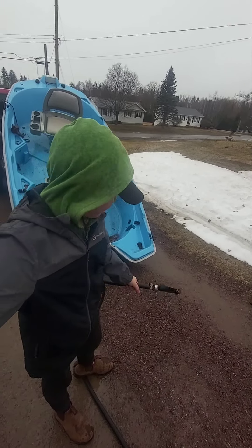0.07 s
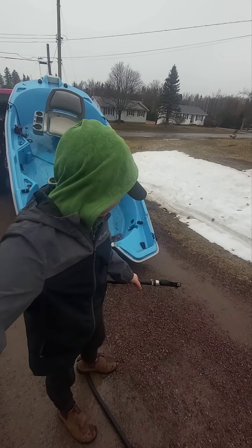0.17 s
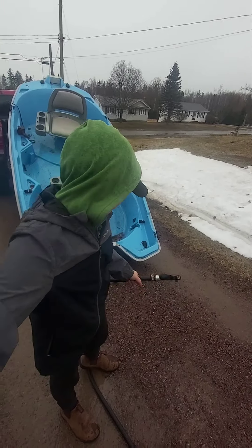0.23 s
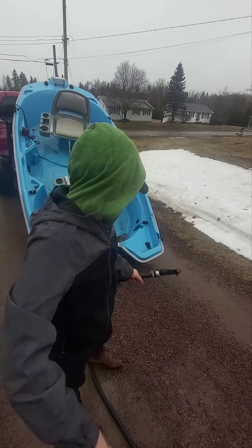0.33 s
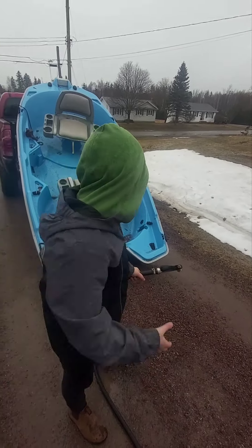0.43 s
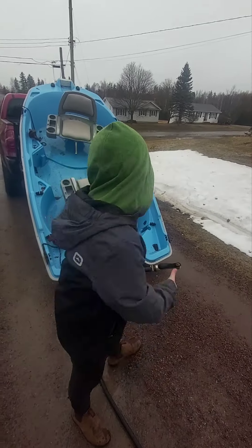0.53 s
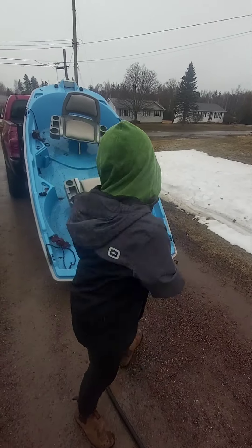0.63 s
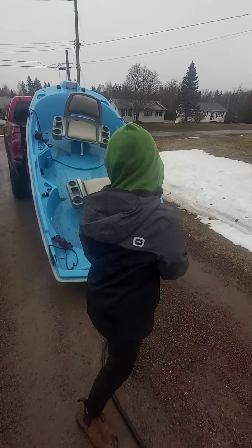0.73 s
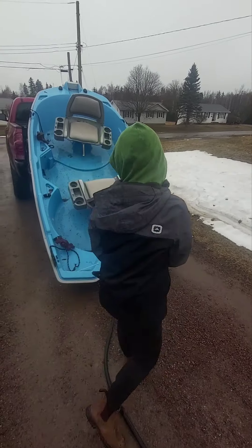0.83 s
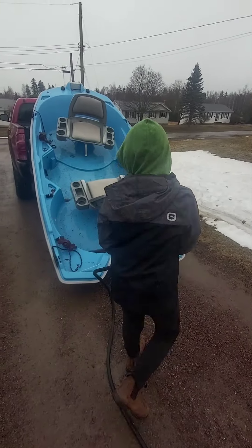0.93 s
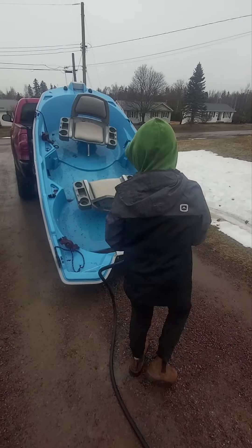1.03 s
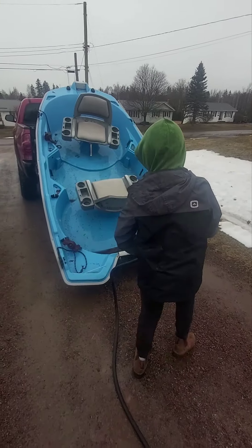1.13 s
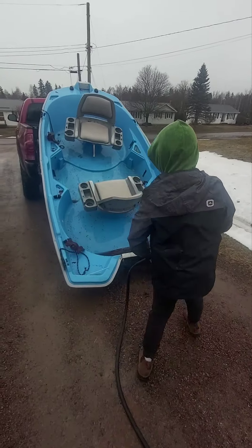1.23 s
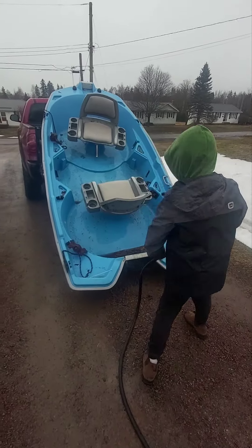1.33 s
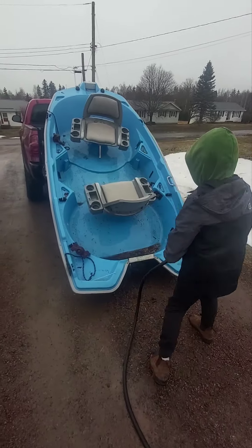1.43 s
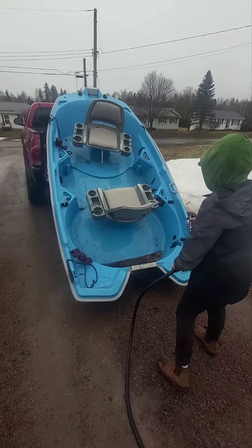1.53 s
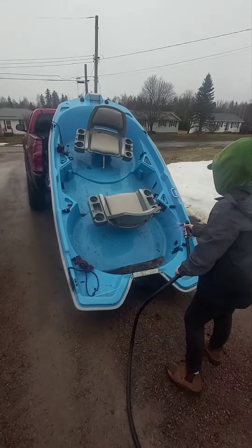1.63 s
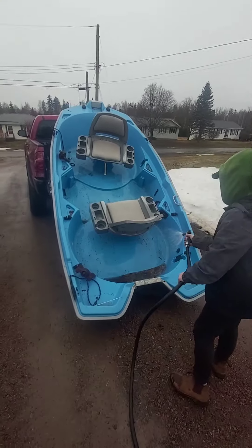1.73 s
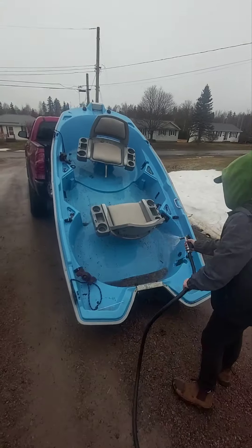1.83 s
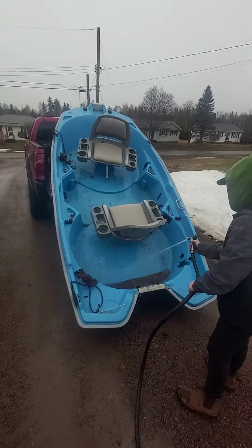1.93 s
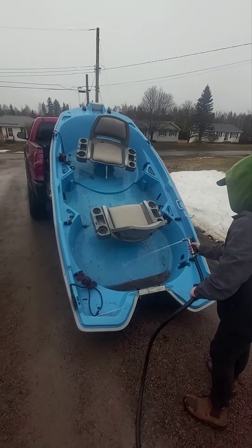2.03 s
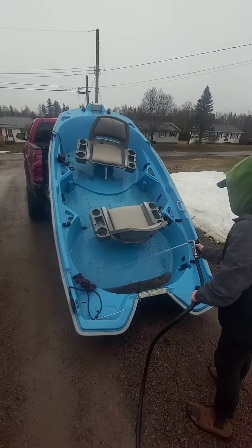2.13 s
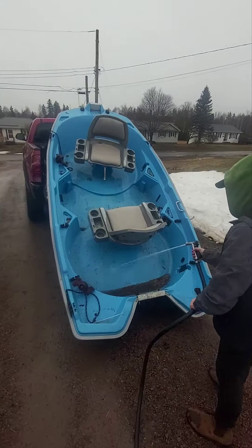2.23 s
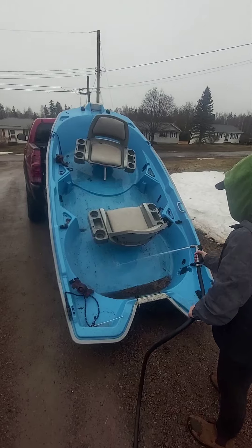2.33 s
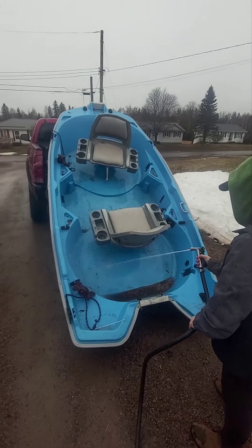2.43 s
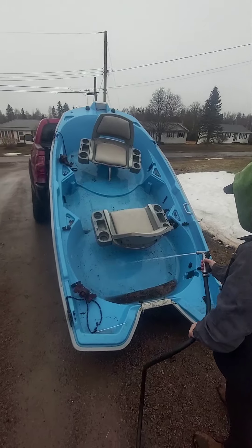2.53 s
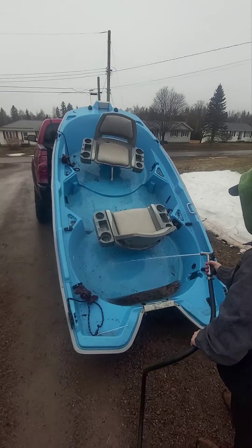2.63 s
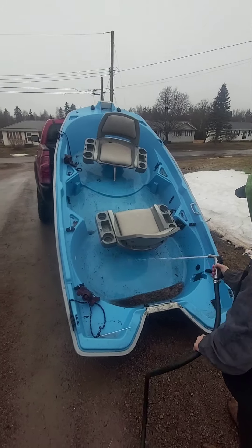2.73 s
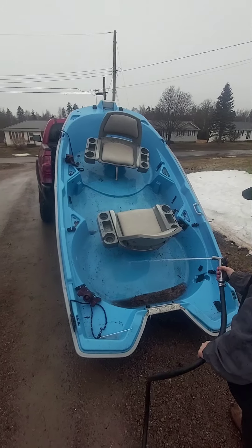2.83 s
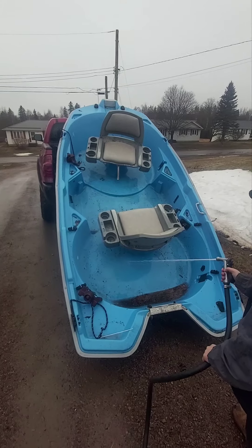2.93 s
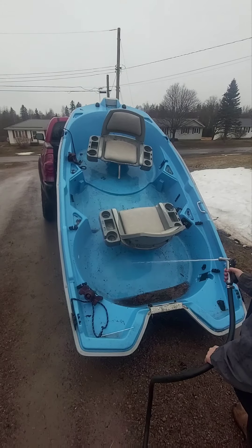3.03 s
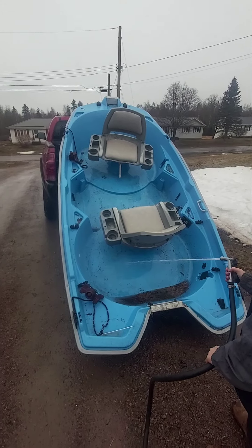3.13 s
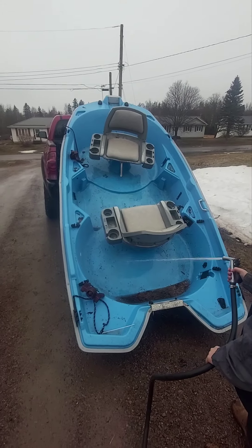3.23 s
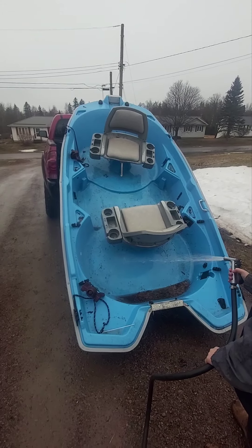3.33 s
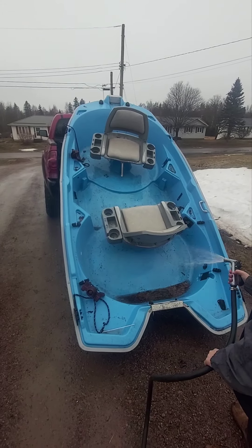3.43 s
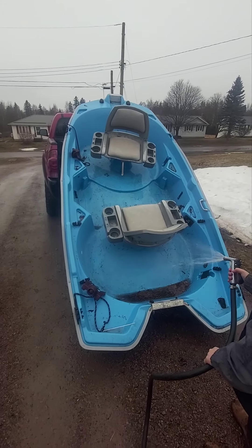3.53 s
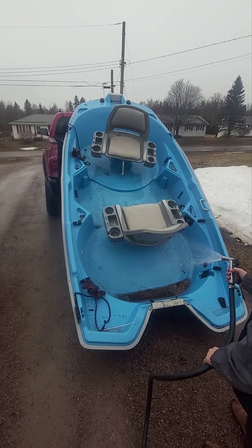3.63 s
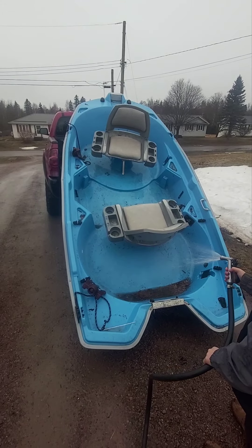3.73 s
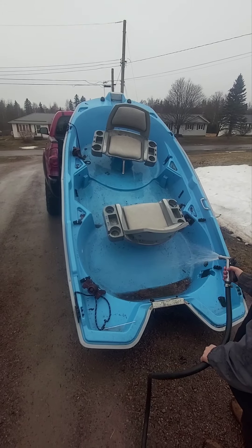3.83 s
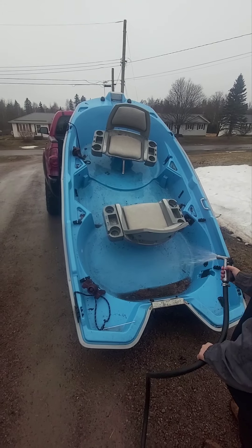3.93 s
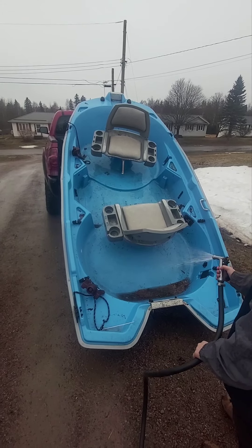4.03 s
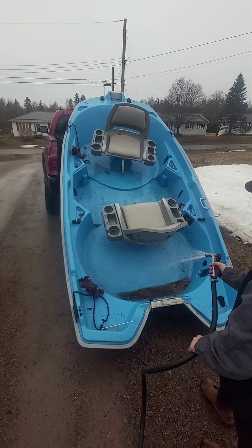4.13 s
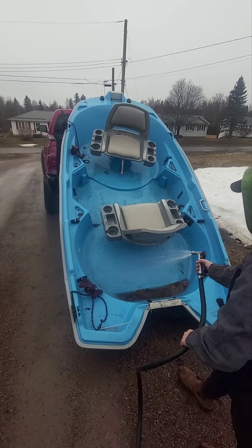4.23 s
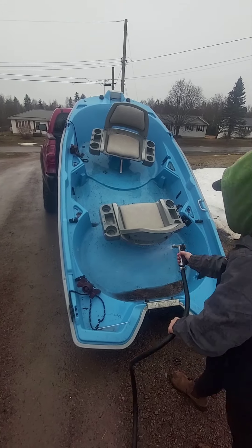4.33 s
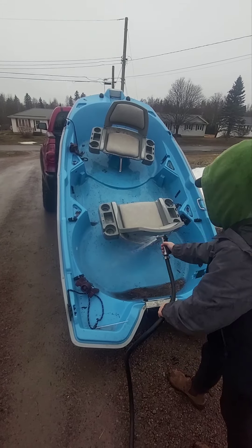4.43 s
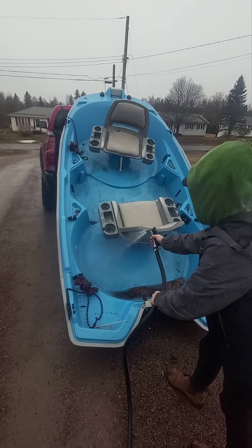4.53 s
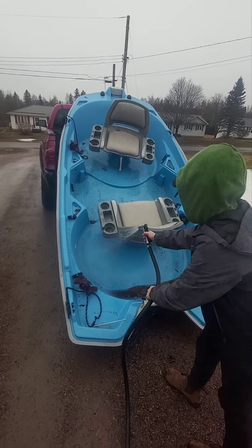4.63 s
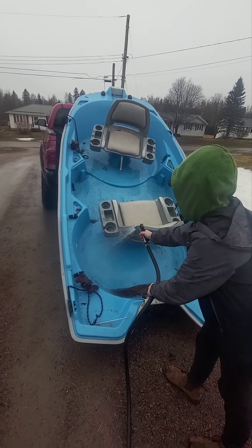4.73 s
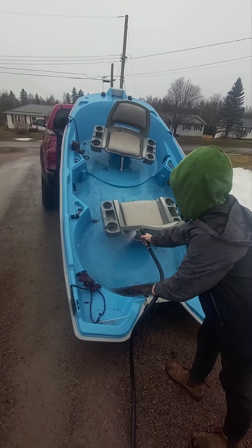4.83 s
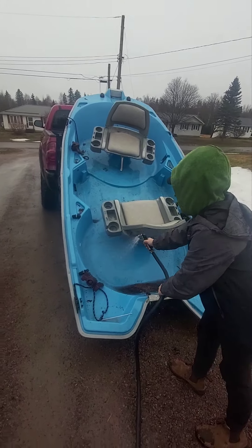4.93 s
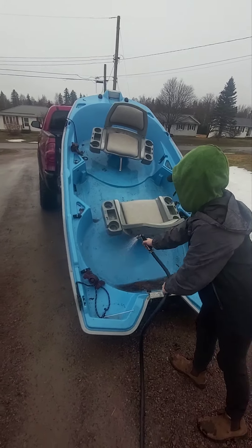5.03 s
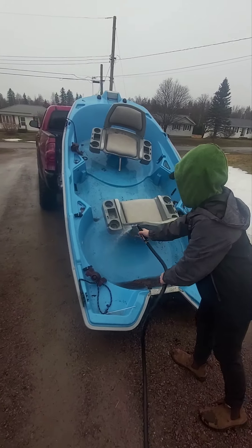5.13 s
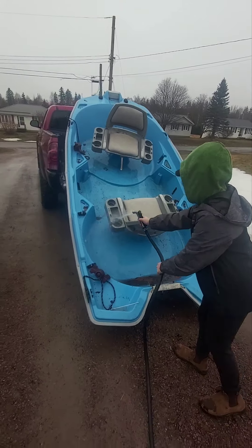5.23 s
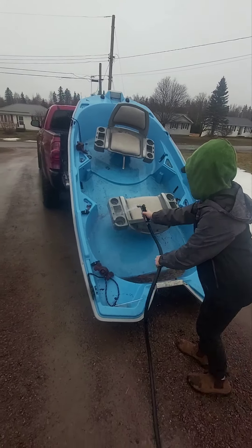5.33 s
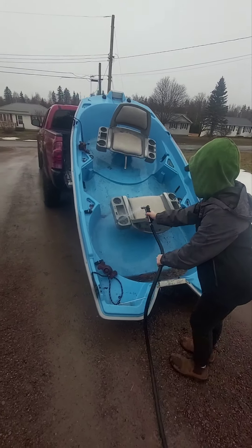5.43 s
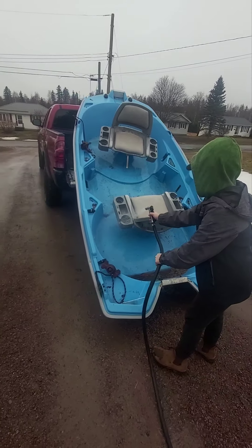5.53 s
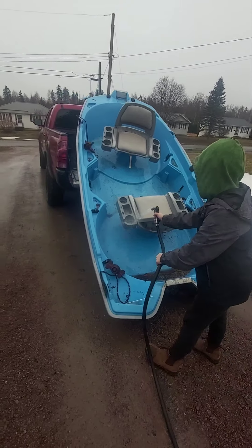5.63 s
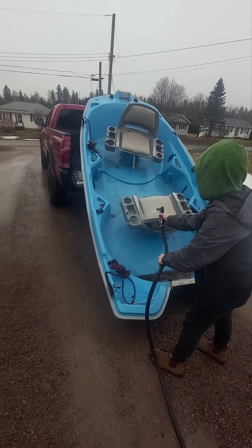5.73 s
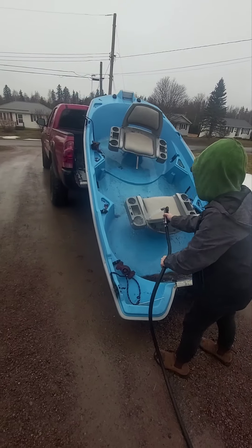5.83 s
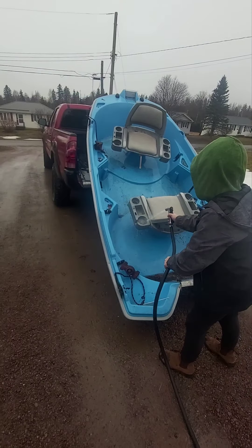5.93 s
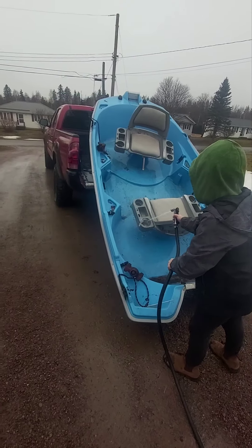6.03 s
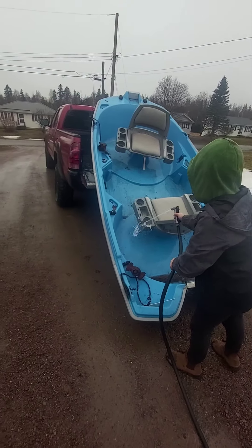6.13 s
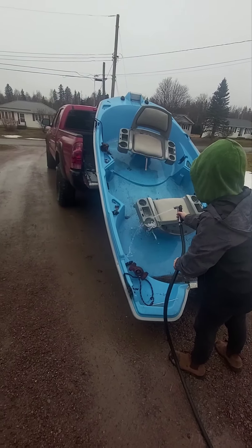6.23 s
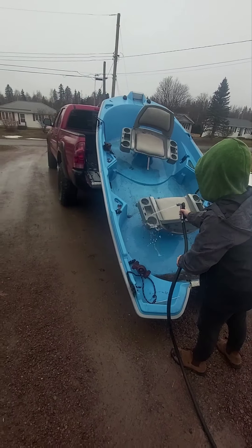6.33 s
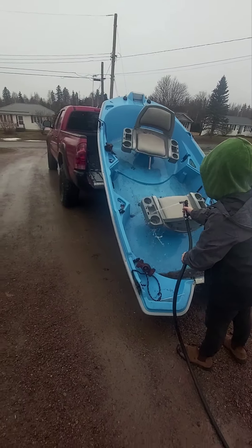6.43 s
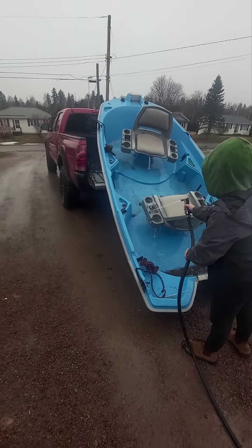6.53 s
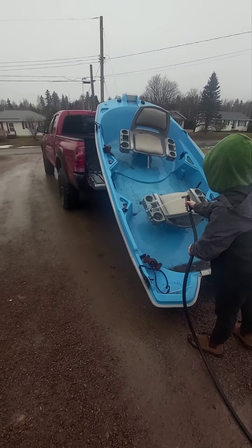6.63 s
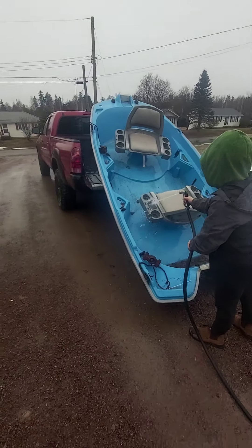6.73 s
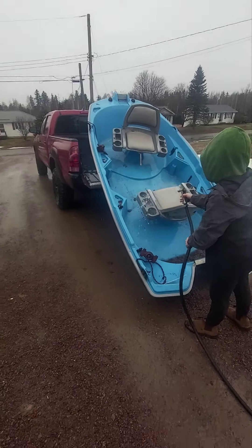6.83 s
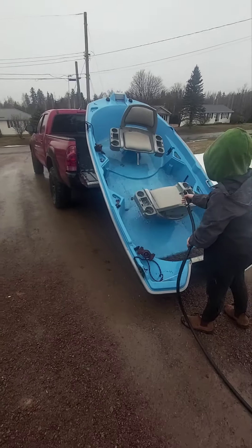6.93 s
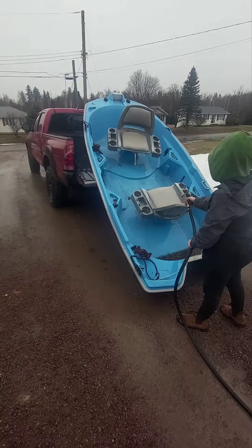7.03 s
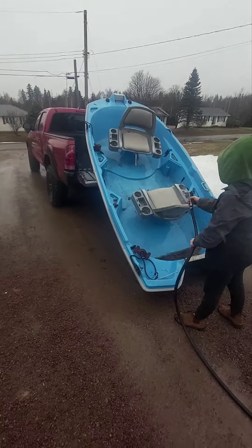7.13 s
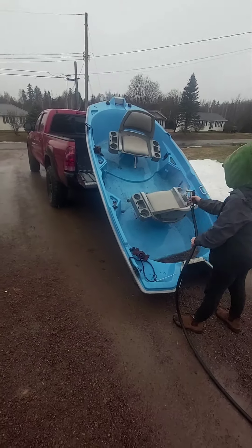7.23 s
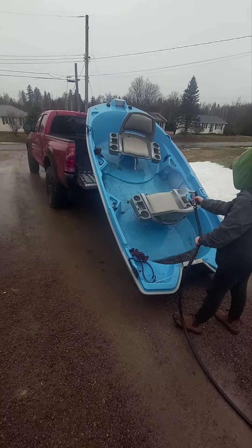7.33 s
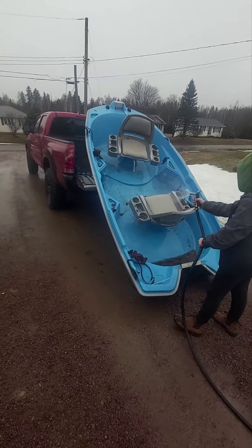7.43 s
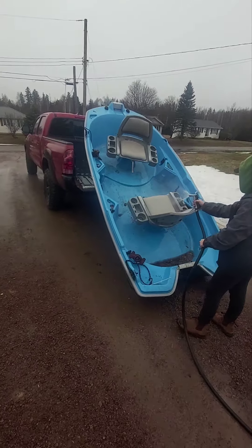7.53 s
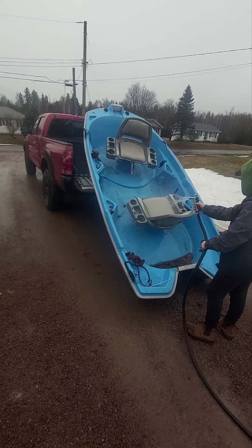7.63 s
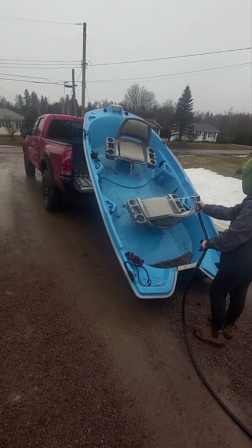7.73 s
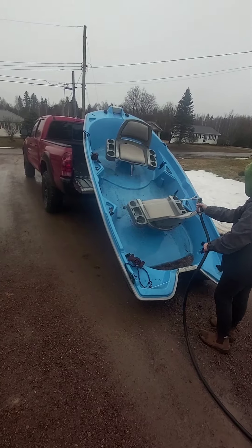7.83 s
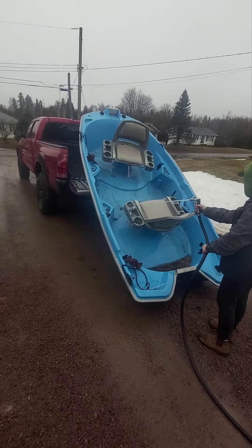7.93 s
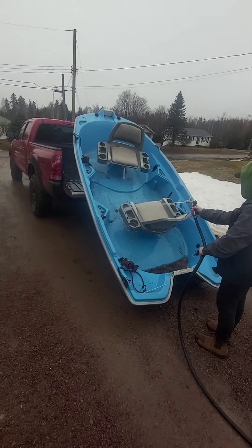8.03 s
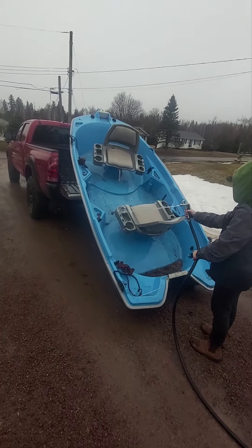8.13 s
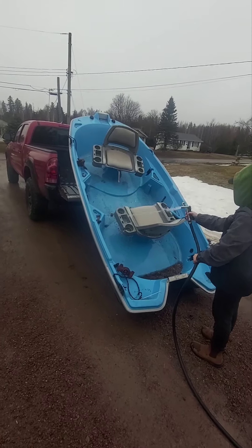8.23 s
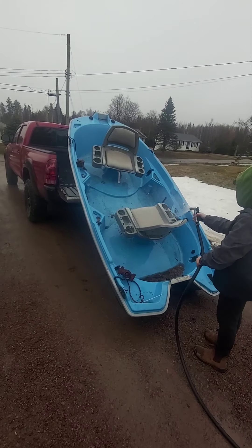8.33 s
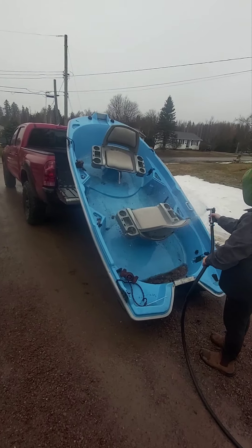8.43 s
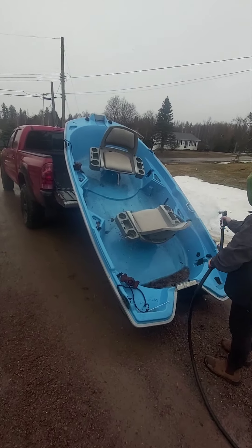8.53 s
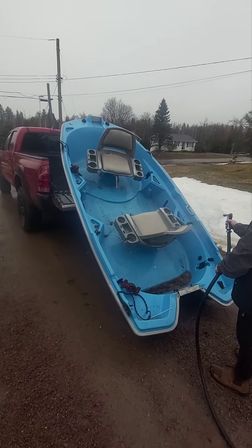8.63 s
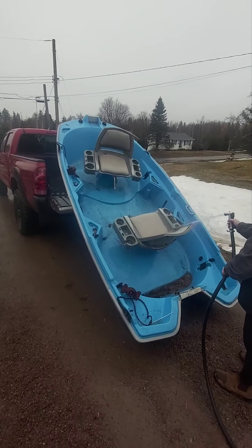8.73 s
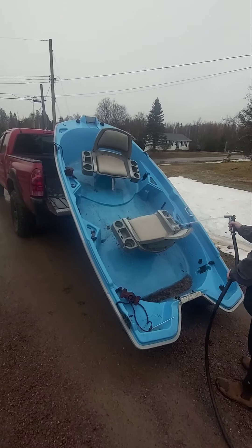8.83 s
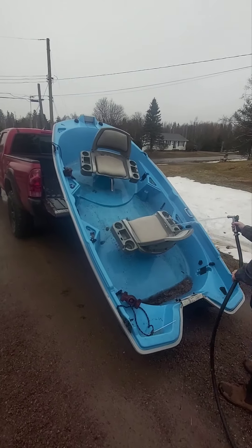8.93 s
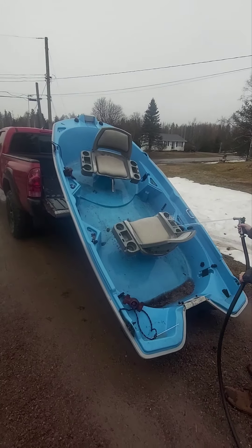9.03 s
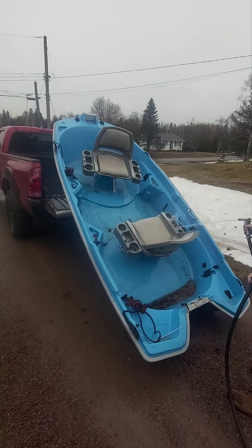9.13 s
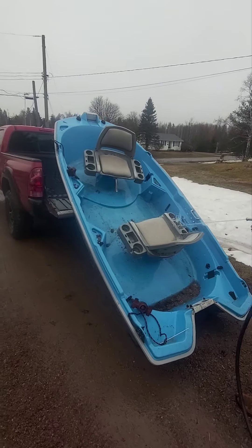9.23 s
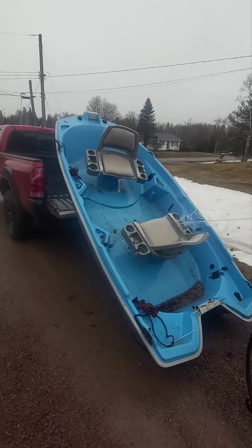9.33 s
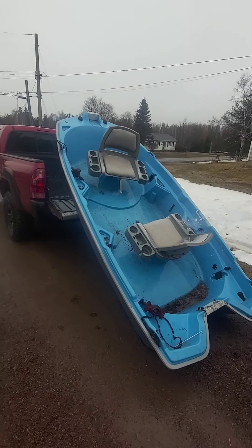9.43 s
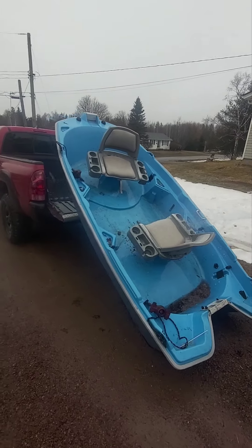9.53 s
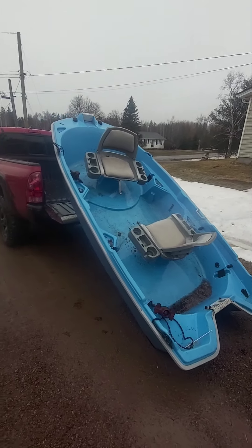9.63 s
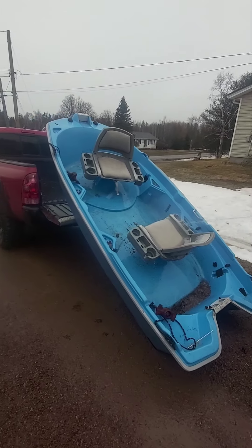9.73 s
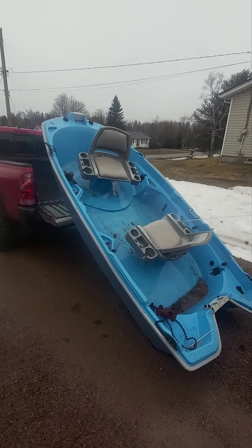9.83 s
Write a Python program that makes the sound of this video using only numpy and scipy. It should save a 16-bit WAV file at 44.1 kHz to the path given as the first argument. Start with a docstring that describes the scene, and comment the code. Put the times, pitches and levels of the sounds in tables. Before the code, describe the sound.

Outdoors on a gravel driveway, boots crunch on the right with small stony clicks while a distant bird whistles. A hose spits air and its jet drums into a hollow plastic boat, dips, then moves over the seat with sharper slaps. It stops briefly, sputters and returns in strong splashes. Wind rumbles low against a close stereo microphone.

```python
"""A gravel driveway, with wind buffeting the two microphone ports throughout over a floor of far air.
First boots crunch up on the right, as sums of short grit bursts, amid short clicks and low drips (decaying
rings with a noise crack), while a far bird whistles. Then a garden hose washes out a plastic boat: noise bursts
hiss and spit air at the nozzle, and random drops ring the resonances of the hull floor, a seat cushion, its frame
and its back by turns, with splash, slaps and one late click."""
import sys
import numpy as np
from scipy import signal
from scipy.fft import rfft, irfft, next_fast_len
from scipy.io import wavfile
from scipy.ndimage import uniform_filter1d, map_coordinates

SR = 44100
rng = np.random.default_rng(int(sys.argv[2]) if len(sys.argv) > 2 else 0)


def put_to_file(sound):
    """Save the sound as 16-bit audio at rate SR, in the file named by the first command-line argument."""
    columns = np.atleast_2d(sound).T  # one column per channel
    safe = np.clip(columns, -1, 1)
    whole_steps = np.round(safe * 32767)
    wavfile.write(sys.argv[1], SR, whole_steps.astype(np.int16))


N = 435708

# Wind buffeting at the ports: (time [s], level [dB])
WIND_LEVELS = [(0, -70), (1.18, -75), (1.28, -63), (1.42, -70), (1.5, -66), (1.7, -68), (1.87, -37),
               (1.95, -41), (2.04, -27), (2.13, -27.5), (2.42, -44), (3.13, -47), (3.21, -36), (3.3, -44.5),
               (3.88, -49.5), (3.95, -65), (4.46, -52), (5.42, -54), (5.51, -41), (5.61, -52),
               (5.77, -32.5), (5.94, -47), (6.05, -40.5), (6.24, -51), (6.33, -38.5), (6.88, -68),
               (7.24, -67), (7.4, -35.5), (7.51, -39.5), (7.65, -36), (7.87, -45.5), (7.95, -37),
               (8.2, -47), (8.27, -31), (8.58, -38), (8.83, -45), (8.95, -36), (9.08, -41), (9.14, -58),
               (9.35, -38), (9.88, -50)]
# Colour of the buffeting and of the far air: (frequency [Hz], density [dB])
BUFFET_SPECTRUM = [(12, -45), (20, -36), (54, 3), (97, 2.5), (120, -1), (182, -9.5), (226, -17),
                   (300, -14.5), (390, -13), (660, -120)]
AIR_SPECTRUM = [(24, -33), (40, -17), (64, -9), (77, -36), (147, -8), (199, -11), (354, -3.5), (630, -9.5),
                (990, -4), (3380, -7.5), (10700, -22.5), (14800, -25), (16000, -36)]
AIR_DB = -57.5
# Calls of the far bird: (time [s], level [dB])
BIRD_CALLS = [(.36, -55), (.528, -54), (.778, -50), (.998, -47), (1.235, -47), (1.518, -47)]
CALL_S, CALL_LOW_HZ, CALL_TOP_HZ = .085, 1018, 1330
# Short clicks and ticks: stones underfoot, low drips, and one late click during the washing:
# (time [s], level [dB], pitch [Hz])
CLICKS = [(0.3036, -33.5, 5230), (0.3696, -41, 1530), (0.411, -37, 1490), (0.4459, -40, 1790),
          (0.482, -41, 1960), (0.539, -36, 2010), (0.595, -39, 1900), (0.671, -37, 3070),
          (0.7287, -31, 3220), (0.7674, -34, 3150), (0.7941, -44, 2340), (0.8427, -29, 3220),
          (0.852, -27, 2600), (0.912, -35, 3500), (1.217, -34, 2840), (1.248, -33, 1620),
          (1.2912, -36, 3180), (1.344, -30, 3650), (1.487, -21, 6800), (1.538, -24, 4500),
          (1.6663, -37, 3280), (7.372, -24, 2720)]
# Boots rolling over gravel: (time [s], crunch [dB], scuff [dB], thud [dB])
FOOTFALLS = [(.28, -66, -75, -61), (.44, -62, -72, -72), (.5, -61, -67, -67), (.56, -59, -70, -68),
             (.62, -59, -68, -63), (.8, -49.5, -54, -74), (.85, -43, -55, -62), (.92, -59, -61, -72),
             (1.22, -50, -63, -56), (1.25, -45, -63, -45.5), (1.3, -58, -70, -61), (1.345, -52.5, -72, -65),
             (1.485, -46, -56, -51), (1.545, -49, -66, -52), (1.6, -53, -70, -60), (1.7, -58, -64, -66),
             (1.755, -56, -68, -40.5)]
STEP_RISE_DB_PER_S, STEP_FALL_DB_PER_S = 400, 192
# Colour of the crunch and the thud underfoot: (frequency [Hz], density [dB])
CRUNCH_SPECTRUM = [(500, -15), (1000, -4.5), (2000, -3.5), (3300, -7), (5000, -7.5), (8000, -40)]
THUD_SPECTRUM = [(100, -17), (250, -3), (450, 2), (900, -19.5)]
RUSTLE_DB, WALK_FROM_S = -68, .45
# Air pockets spitting from the nozzle: (time [s], level [dB], 60 dB decay [s])
AIR_SPITS = [(1.7814, -19.5, 0.2), (1.8338, -12.5, 0.055), (2.3785, -32, 0.054), (3.1617, -21.5, 0.091),
             (4.368, -32.5, 0.062), (4.4345, -14.5, 0.098), (4.6902, -18, 0.094), (4.9561, -21, 0.097),
             (5.1886, -22, 0.065), (5.234, -23, 0.059), (5.7249, -22, 0.11), (6.223, -16, 0.049),
             (7.2843, -38.5, 0.13), (7.3557, -40, 0.1), (7.427, -33.5, 0.058), (7.4589, -30, 0.18),
             (7.5522, -30.5, 0.074), (7.6011, -41, 0.072), (7.888, -25, 0.048), (8.0875, -21, 0.053),
             (8.2761, -24.5, 0.054), (8.4781, -30, 0.051), (8.688, -30, 0.27), (8.954, -37, 0.11)]
# The jet: (time [s], force on what it strikes [dB], nozzle hiss [dB])
JET_LEVELS = [(1.77, -52, -64), (1.8, -49.5, -70), (1.91, -44.5, -35), (2.08, -40.5, -37.5),
              (2.13, -28.5, -29.5), (2.26, -26, -30.5), (2.9, -27.5, -28), (3.36, -28, -29.5),
              (3.48, -31.5, -35.5), (3.6, -42, -45.5), (4.42, -40, -43.5), (4.435, -36, -26),
              (4.48, -37.5, -28.5), (4.53, -45.5, -41.5), (4.57, -38, -37.5), (4.78, -34, -34.5),
              (5.4, -35, -35), (5.46, -31, -33), (5.62, -34, -33), (5.87, -31.5, -35), (6.27, -29, -30),
              (6.38, -36, -33), (6.45, -33, -31), (6.49, -18, -33.5), (6.83, -22.5, -39.5),
              (6.93, -31.5, -35), (6.98, -43, -49), (7.14, -60.5, -59.5), (7.27, -76, -66),
              (7.3, -58.5, -48), (7.34, -61, -53), (7.365, -58, -46), (7.385, -42, -44), (7.42, -55.5, -57),
              (7.47, -48, -40), (7.52, -50, -54), (7.8, -49.5, -53), (7.87, -34.5, -38.5), (8.06, -36, -32),
              (8.2, -30, -37), (8.35, -27.5, -31.5), (8.41, -31, -30.5), (8.44, -43.5, -44),
              (8.83, -42, -47), (8.97, -25.5, -31.5), (9.027, -28.5, -35), (9.037, -15, -50),
              (9.19, -18.5, -54), (9.225, -25, -34), (9.26, -20, -40), (9.3, -19.5, -53),
              (9.31, -25.5, -58), (9.36, -21, -43), (9.51, -28.5, -37), (9.6, -45.5, -49.5),
              (9.88, -40.5, -46)]
# What the jet strikes until the next swing of the hose; the rest of the share falls on the hull:
# (time [s], cushion share [0-1], frame share [0-1], back share [0-1],
#  hull boom over the force [dB], splash over the force [dB])
JET_AIM = [(1.7, 0, 0.045, 0.051, -3.5, 2.5), (2.09, 0.13, 0, 0.013, 0, -5.5),
           (3.5, 0.05, 0.025, 0.017, -1, -2), (4.55, 0.04, 0.0047, 0.12, -1, -2),
           (5.2, 0.1, 0.42, 0.19, -3, -1), (5.42, 0, 0.036, 0.0083, -19, 3),
           (5.65, 0.19, 0.74, 0.034, -17.5, -2.5), (6.46, 0.62, 0.11, 0.14, -29, -7),
           (6.97, 0.05, 0.26, 0, -0.5, -1.5), (7.28, 0.1, 0, 0.089, 11, 1), (7.37, 0, 0.086, 0, 11.5, 2.5),
           (7.52, 0, 0, 0, 0.5, 2.5), (7.84, 0.39, 0.41, 0.035, -17, -3), (8.43, 0, 0, 0.048, -1, 1),
           (8.9, .1, 0.2, 0.14, -9.5, -0.5), (9.03, 0.02, 0.035, 0.91, -32, -10.5),
           (9.3, 0.26, 0.23, 0.33, -21.5, -8.5), (9.56, 0.02, 0, 0.056, -6.5, 0)]
SWING_S = 0.011
SURGE_DB, SURGE_PER_S = 1.0, 12
# Slugs of water slapping the boat: (time [s], level [dB], bright spatter [dB])
WATER_SLAPS = [(2.18, -40, -30), (2.25, -27, -44), (2.41, -24, -41), (2.68, -37, -38), (3.16, -34, -43),
               (5.44, -27.5, -46), (5.499, -33, -51), (5.656, -23.5, -38), (5.897, -20.5, -30),
               (6.086, -25, -35), (6.129, -25, -33), (6.27, -21.5, -30), (6.471, -21, -31),
               (7.887, -48, -23), (7.982, -34, -21), (8.049, -56, -24.5), (8.097, -27.5, -43),
               (8.128, -22, -42), (8.268, -20.5, -39), (8.348, -22, -43), (8.956, -45, -12.5),
               (9.031, -29, -21), (9.069, -13, -22), (9.129, -31, -16.5), (9.178, -17.5, -39),
               (9.25, -21, -37), (9.339, -23, -36), (9.399, -23, -41)]
SLAP_T60_S, SLAP_SPLASH_DB = 0.1, -5.5
# Resonances of the hull floor, its low boom, and the seat's parts: (centre [Hz], width [Hz], level [dB])
HULL_MODES = [(510, 122, -6), (990, 293, 2.5), (1840, 170, 5)]
BOOM_MODES = [(150.5, 11, -12), (209, 20.5, -6.5), (251, 7.6, -0.5), (309.5, 40, -3.5), (367, 118, -3),
              (481, 197, -1.5)]
CUSHION_MODES = [(673, 160, -1), (789, 237, 5.5), (939, 39, 12), (1213, 26, -4), (1450, 130, -4.5),
                 (1692, 73, 6), (1800, 46, -21), (2664, 99, 1.5), (3084, 43, -2)]
FRAME_MODES = [(882, 34, 7.5), (1026, 117, 1), (1275, 89, 2), (1635, 81, -7.5), (2005, 13, -4),
               (2115, 19, 1), (2372, 45, -4), (2810, 230, -9)]
BACK_MODES = [(554, 69, -18), (647, 36, 5.5), (765, 43, -2), (892, 59, -4), (1200, 37, -7), (1167, 29, -2),
              (1510, 39, -12.5), (1777, 38, -0.5), (2100, 45, -14), (2390, 100, -19)]
# Colour of splash, slap spatter, hiss and spits: (frequency [Hz], density [dB])
SPLASH_SPECTRUM = [(900, -18), (1800, -4.5), (2400, 0), (3000, -1.5), (3450, 0.5), (3900, -2), (4800, -10),
                   (6500, -33)]
SPATTER_SPECTRUM = [(2200, -35), (3000, 6), (3500, 6), (4500, 12), (5500, -1), (7500, -22)]
HISS_SPECTRUM = [(2060, -19), (3500, -11.5), (4900, -4.5), (7180, -5), (8210, -9.5), (11500, -4),
                 (12600, -8), (15100, -9), (16000, -21)]
SPIT_SPECTRUM = [(880, -29), (1500, -15.5), (3880, -6), (4420, -2), (6180, -1.5), (6960, -1), (7920, -2.5),
                 (11300, -4), (16000, -14)]
# Left-right likeness of scattered sound, direct sound, mist and buffeting: (frequency [Hz], likeness [0-1])
SCATTERED = [(60, 0.1), (130, 1), (300, 1), (700, 0.97), (1400, 0.2), (3000, 0.16), (6000, 0),
             (15000, 0.18)]
DIRECT_SOUND = [(300, 1), (700, 1), (1100, 0.35), (1400, 0.62), (2000, 0.63), (4000, 0.48), (15000, 0.092)]
MIST_SOUND = [(4000, 0.3), (8000, 0.21), (15000, 0.32)]
BUFFET_ALIKE = [(50, 0.05), (200, 0.44)]
# Balance of the microphone ports: (frequency [Hz], left minus right [dB])
PORT_LEAN = [(60, -1), (150, -2), (1300, -1.5), (2000, -6.5), (2800, -8.5), (3450, -15), (4100, -3),
             (5200, -5.5), (6100, 1), (7200, 7), (8700, -8), (9300, -6), (10500, -2.5), (13000, 2.5),
             (16000, 9.5)]
# Phase between the ports: (frequency [Hz], lead of the right [rad])
PORT_LEAD = [(100, 0.5), (1600, 0.46), (2700, 0.72), (4500, -2), (7000, -2), (9000, -3), (12000, -4.5),
             (16000, -11)]
TOP_HZ = 16050


def amp(db):
    """Amplitude for a level in dB."""
    return 10 ** (np.asarray(db) / 20)


def unit(x):
    """Scale so that the mid channel has rms 1."""
    return x / np.sqrt(np.mean(x.mean(0) ** 2) + 1e-20)


def along(points, hz):
    """Interpolate (frequency [Hz], value) points on a log frequency axis."""
    f, v = np.transpose(points)
    return np.interp(np.log(hz + 1), np.log(f + 1), v)


def curves(rows):
    """One value per sample for each column after the time."""
    s, *cols = np.transpose(rows)
    return [np.interp(np.arange(N) / SR, s, c, left=c[0]) for c in cols]


def held(rows, swing_s):
    """Each row's values hold until the next row, blended over a swing."""
    s, *cols = np.transpose(rows)
    row = np.clip(np.searchsorted(s * SR, np.arange(N)) - 1, 0, None)
    return uniform_filter1d(np.array(cols)[:, row], max(round(swing_s * SR), 1), axis=1)


def wobble(rate):
    """A smooth random curve, rate knots a second."""
    knots = rng.standard_normal(int(N * rate / SR) + 4)
    return map_coordinates(knots, [np.arange(N) * rate / SR])


def puffs(times, levels_db, t60s, attack):
    """Envelope of sudden bursts that die away; attack is a time constant in s."""
    level, t = np.zeros(N + SR), np.arange(SR // 3) / SR
    for s, db, t60 in np.broadcast(times, levels_db, t60s):
        decay = amp(db - 60 * t / max(t60, .01))
        level[round(s * SR):][:len(t)] += decay * (1 - np.exp(-t / attack))
    return level[:N]


def filtered(x, response):
    """x through a complex response of frequency."""
    m = next_fast_len(x.shape[-1] + 8192, real=True)
    spectrum = rfft(x, m) * response(np.fft.rfftfreq(m, 1 / SR))
    return irfft(spectrum, m)[..., :x.shape[-1]]


def shape(spectrum):
    """Gain over frequency of a (frequency [Hz], density [dB]) spectrum."""
    return lambda hz: amp(along(spectrum, hz))


def modes(table):
    """Causal response of a set of resonances, added with alternating sign."""
    def response(f):
        total = 0
        for k, (centre, width, db) in enumerate(table):
            resonance = 1j * f * width / (centre ** 2 - f ** 2 + 1j * f * width)
            total = total + (-1) ** k * amp(db) * resonance
        return total
    return response


def small(response, low_hz):
    """A small part radiates little below its first modes."""
    return lambda f: response(f) * ((1j * f / low_hz) / (1 + 1j * f / low_hz)) ** 5


def stereo(pair, response, alike=SCATTERED):
    """Colour a pair of streams and spread it over both ports, mid rms 1."""
    def mid_side(hz):
        turn = np.arccos(np.clip(along(alike, hz), -1, 1)) / 2
        return response(hz) * [np.cos(turn), np.sin(turn)]
    mid, side = filtered(pair, mid_side)
    return unit(np.array([mid + side, mid - side]))


def drops(per_s, spread_db, lumpy_db, patchy_db):
    """Two noise streams of impacts: shared strength jumps with each drop and clump, colour drifts in patches."""
    z = signal.stft(rng.standard_normal((2, N)), nperseg=512)[2]
    field = uniform_filter1d(rng.standard_normal(z.shape[1:]), size=3, axis=0)
    field = uniform_filter1d(field, size=9, axis=1)
    pair = signal.istft(z * amp(patchy_db * field / field.std()), nperseg=512)[1][:, :N]
    hit = (rng.random(N) < per_s / SR) * amp(spread_db * rng.exponential(size=N))
    strength = np.sqrt(1 + uniform_filter1d(hit, size=40) * 40)  # each hit lasts 40 samples
    return pair * strength * amp(lumpy_db * (wobble(60) + wobble(17)))


def far_air():
    """The distant outdoors is a smooth noise floor."""
    return amp(AIR_DB) * stereo(rng.standard_normal((2, N)), shape(AIR_SPECTRUM))


def wind():
    """Wind buffets the ports as low noise that differs from port to port."""
    lumps = amp(1.6 * np.array([wobble(11), wobble(12)]))
    rumble = stereo(rng.standard_normal((2, N)), shape(BUFFET_SPECTRUM), BUFFET_ALIKE)
    return amp(curves(WIND_LEVELS)[0]) * unit(lumps * rumble)


def bird():
    """Short whistles arch up and down in pitch; a house wall answers, trees smear the tail."""
    calls, u = np.zeros(N), np.linspace(0, 1, round(CALL_S * SR))
    arch = np.abs(np.sin(np.pi * u))
    pitch = CALL_LOW_HZ + (CALL_TOP_HZ - CALL_LOW_HZ) * arch ** 0.83
    swell = np.sqrt(arch) * (1 - .7 * arch ** 4)  # weaker at the arch top
    whistle = swell * np.sin(2 * np.pi * np.cumsum(pitch) / SR)
    for s, db in BIRD_CALLS:
        calls[round(s * SR):][:len(u)] = amp(db) * whistle
    t = np.arange(SR // 3) / SR
    tail = rng.standard_normal((2, len(t))) * amp(-60 * t / .5)
    trees = signal.fftconvolve(calls[None], tail / np.linalg.norm(tail[0]), axes=1)[:, :N]
    wall = np.roll(calls, round(.088 * SR))
    direct = calls * amp(1.5 * wobble(70))  # the air makes it waver
    return direct + amp(-6) * wall + amp(-2.5) * trees


def on_right(x):
    """Lean a source towards the right port."""
    return x * amp([[-1.2], [1.2]])


def clicks():
    """Stones underfoot, low drips and one late click: each a short decaying ring with a crack of noise."""
    ticks = np.zeros((2, N + SR))
    t = np.arange(SR // 50) / SR
    for s, db, hz in CLICKS:
        ring = np.sin(2 * np.pi * hz * t) * amp(-60 * t / .009)
        crack = 0.36 * rng.standard_normal((2, len(t))) * amp(-60 * t / .004)
        ticks[:, round(s * SR):][:, :len(t)] += amp(db) * (ring + crack)
    return on_right(ticks[:, :N])


def steps():
    """Gravel grinds under each sole as the weight comes on and lifts; a jacket rustles."""
    end = round(FOOTFALLS[-1][0] * SR) + SR // 4
    t = np.arange(end) / SR
    s, crunch_db, scuff_db, thud_db = np.transpose(FOOTFALLS)[:, :, None]
    since = t - s
    weight_db = np.minimum(STEP_RISE_DB_PER_S * since, -STEP_FALL_DB_PER_S * since)
    crunch, scuff, thud = (amp(db + weight_db).sum(0) for db in (crunch_db, scuff_db, thud_db))
    grit = drops(250, 5.0, lumpy_db=1.5, patchy_db=3.5)[:, :end]
    walk = np.zeros((2, N))
    walk[:, :end] += crunch * stereo(grit, shape(CRUNCH_SPECTRUM))
    walk[:, :end] += scuff * stereo(grit, shape(HISS_SPECTRUM))
    walk[:, :end] += thud * stereo(grit, shape(THUD_SPECTRUM))
    moving = np.clip((t - WALK_FROM_S) / .2, 0, 1)  # the jacket rustles evenly while its wearer walks
    rustle = stereo(rng.standard_normal((2, end)), shape(HISS_SPECTRUM), MIST_SOUND)
    walk[:, :end] += amp(RUSTLE_DB) * moving * rustle
    return on_right(walk)


def spits():
    """Each air pocket bursts from the nozzle as a puff of bright noise."""
    noise = stereo(rng.standard_normal((2, N)), shape(SPIT_SPECTRUM), DIRECT_SOUND)
    return puffs(*np.transpose(AIR_SPITS), attack=0.0011) * noise


def surge():
    """Random wavering; each call gives a layer of the water its own."""
    return amp(SURGE_DB * wobble(SURGE_PER_S))


def drumming(impacts, seat_shares):
    """Drops ring the hull floor and the seat's parts, each by the share of the jet it takes."""
    seat_shares = np.clip(seat_shares, 0, 1)
    hull_share = np.clip(1 - seat_shares.sum(0), 0, 1)
    drum = np.sqrt(hull_share) * stereo(impacts, modes(HULL_MODES))
    for share, part in zip(seat_shares, (CUSHION_MODES, FRAME_MODES, BACK_MODES)):
        drum = drum + np.sqrt(share) * stereo(impacts, small(modes(part), 370), DIRECT_SOUND)
    return drum


def jet():
    """Drops and slaps drum on what the jet strikes and boom in the hull; water splashes, the nozzle hisses."""
    force_db, hiss_db = curves(JET_LEVELS)
    *seat_shares, boom_db, splash_db = held(JET_AIM, SWING_S)
    impacts = drops(300, 0.91, lumpy_db=0.71, patchy_db=2.0)
    spray = drops(400, 0.34, lumpy_db=0.79, patchy_db=2.5)
    s, slap_db, spatter_db = np.transpose(WATER_SLAPS)
    slap = puffs(s, slap_db, SLAP_T60_S, attack=0.0064)
    spatter = puffs(s, spatter_db, SLAP_T60_S, attack=0.0037)
    force = amp(force_db) * surge() + slap
    splash = amp(force_db + splash_db) * surge() + amp(SLAP_SPLASH_DB) * slap
    water = force * drumming(impacts, seat_shares)
    # the boom takes the same drops in reversed time order
    water = water + amp(boom_db) * force * surge() * stereo(impacts[:, ::-1], modes(BOOM_MODES))
    water = water + splash * stereo(spray, shape(SPLASH_SPECTRUM), DIRECT_SOUND)
    water = water + spatter * stereo(spray[::-1], shape(SPATTER_SPECTRUM), DIRECT_SOUND)
    water = water + amp(hiss_db) * surge() * stereo(spray, shape(HISS_SPECTRUM), MIST_SOUND)
    return water * (np.arange(N) >= JET_LEVELS[0][0] * SR)  # silent until the jet starts


def scene():
    """The whole driveway, from the far air to the jet."""
    return far_air() + wind() + bird() + clicks() + steps() + spits() + jet()


def record(dry):
    """Each port has its own colour and phase; peaks are rounded off and nothing is kept above the band limit."""
    def ports(hz):
        gain = amp(np.outer([.5, -.5], along(PORT_LEAN, hz)))
        return gain * np.exp(1j * np.outer([-.5, .5], along(PORT_LEAD, hz)))
    x = filtered(dry, ports)
    x = x / (1 + np.abs(x / .97) ** 8) ** (1 / 8)
    return filtered(x, lambda hz: hz < TOP_HZ)


dry = scene()
out = record(dry)
put_to_file(out)
```